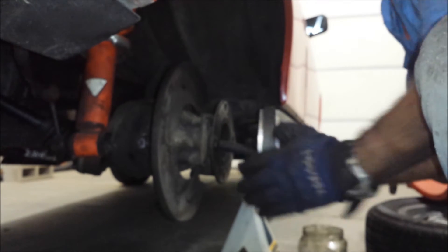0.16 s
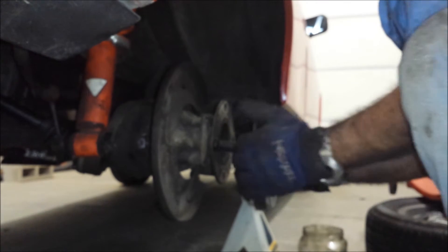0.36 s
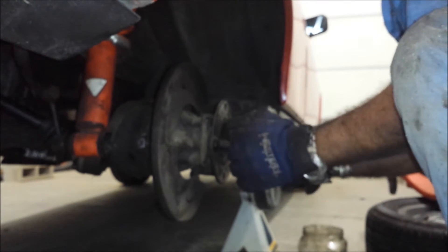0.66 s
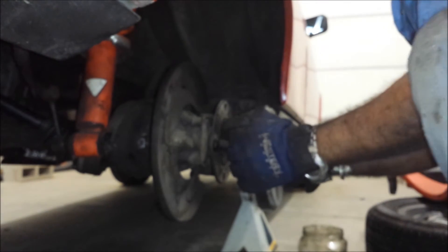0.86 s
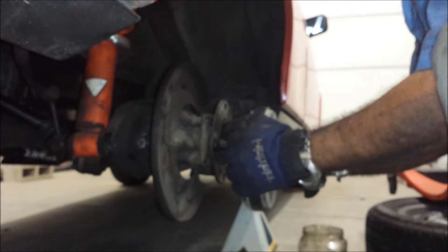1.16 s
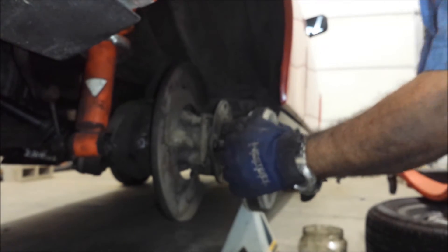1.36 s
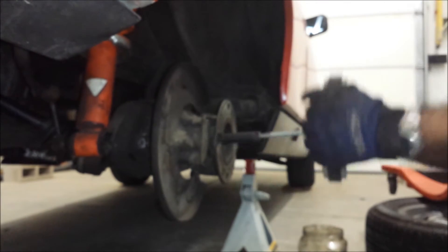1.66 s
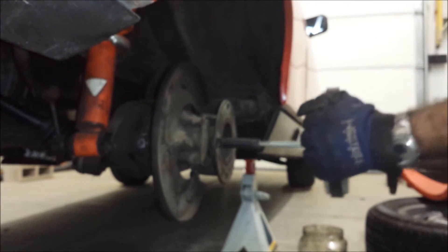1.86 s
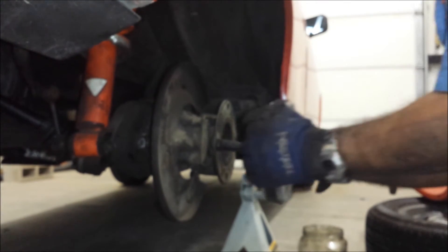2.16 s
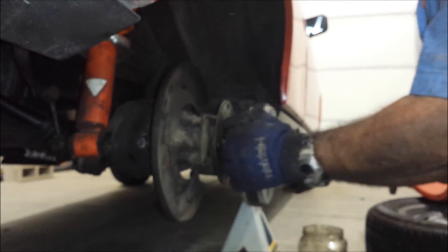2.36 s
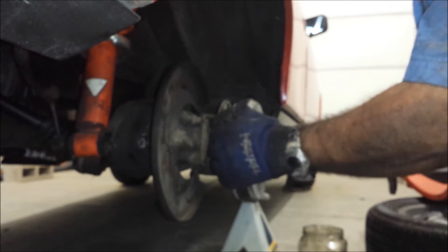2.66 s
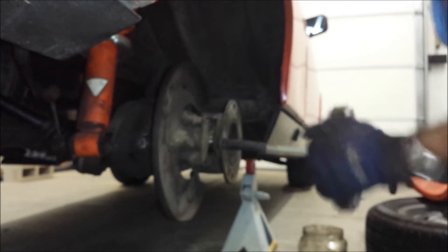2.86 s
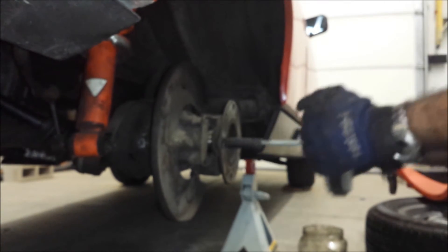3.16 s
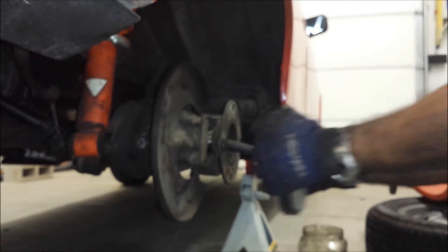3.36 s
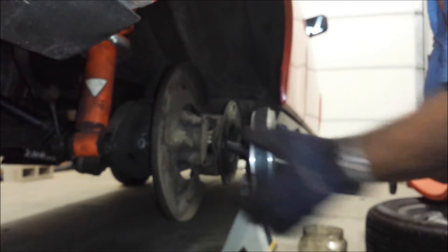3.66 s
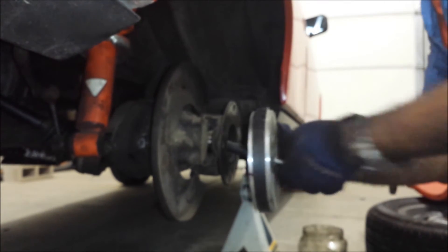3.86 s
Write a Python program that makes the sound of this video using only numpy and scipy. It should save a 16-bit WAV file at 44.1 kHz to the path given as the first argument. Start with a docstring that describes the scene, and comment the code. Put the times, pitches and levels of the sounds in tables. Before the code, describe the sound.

Close beside a car's wheel hub, fading metallic ring and soft cloth rub give way to a sudden huge clanging slam with a dense garage tail. The weight slides back with a gritty singing scrape, then a sharper second slam rings out. After another short slide come a dull knock and faint clinks. The loud hits clip and briefly push the background down.

```python
"""A homemade slide hammer pulls a wheel hub in a garage, over a low hum and hiss. At the start the hub and rod
still ring from an earlier, lighter blow; cloth rubs, small clinks and a soft knock follow. The heavy weight
scrapes along its steel rod and slams into the stop, slides back, and slams again; then it slides and knocks.
Blows are noise bursts with decaying modes and room echoes; friction is filtered noise under movement envelopes.
The microphone overloads: gain control ducks the sound and peaks clip."""
import sys
import numpy as np
from scipy import signal
from scipy.fft import rfft, irfft
from scipy.io import wavfile

SR = 44100
rng = np.random.default_rng(int(sys.argv[2]) if len(sys.argv) > 2 else 0)


def unload_audio(sound):
    """Save the sound as a 16-bit wav file, at the path given as the first command line argument."""
    columns = np.transpose(np.atleast_2d(sound))
    # keep every value between -1 and 1, then stretch to whole-number steps
    steps = np.round(np.clip(columns, -1, 1) * 32767)
    wavfile.write(sys.argv[1], SR, steps.astype(np.int16))


N = 177634
TIME, HZ = np.arange(N) / SR, np.fft.rfftfreq(N, 1 / SR)

# Hub and housing modes. Each row: frequency in Hz, relative level in dB, t60 in seconds.
HOUSING_MODES = [(75, -4, .9), (151, -4, .7), (172, -1, .9), (196, -19, 3.3), (240, 0, .8), (273, -4, .7),
                 (305, -5, .8), (398, -4, .6), (431, 1, .7), (549, -5, .7), (613, -5, .7), (743, -10, .5),
                 (809, 1, .75), (1065, -2, .8), (1092, -4, .6), (1240, -3, .65), (1400, -9, .7),
                 (1470, -9, .7), (1990, -7, .7), (3698, -14, 1.0)]
# Rod and weight modes. Each row: frequency in Hz, relative level in dB, t60 in seconds.
STEEL_MODES = [(1545, -19, .5), (1884, -14, .7), (2789, -16, .6), (3160, -13, .8), (3712, -18, .6),
               (3833, -16, .6), (4269, -19, .6), (4630, -19, .65), (4920, -16, .6), (5238, -14, .85),
               (5454, -13, .5), (5603, -8, .5), (5647, 0, .65), (5662, -5, .5), (5690, -8, .45),
               (5831, -10, .45), (5949, -10, .5), (6122, -12, .45), (6190, -10, .6), (6395, -11, .4),
               (7655, -13, .7), (8016, -19, .6), (9846, -15, .2), (10180, -24, .4), (10228, -21, .5)]
# Likeness of the two ears. Each row: frequency in Hz, correlation from -1 to 1.
EAR_LIKENESS = [(100, .96), (250, 0.75), (500, 0.6), (1000, -0.03), (4000, 0), (14000, 0)]
# Stereo balance of direct sound. Each row: frequency in Hz, left minus right in dB.
NEAR_BALANCE = [(60, -7), (130, 8.5), (290, -1.5), (630, 3.5), (1370, -3.5), (2980, 8), (6520, -0.5),
                (14200, -5)]
# Stereo balance of rings and echoes. Each row: frequency in Hz, left minus right in dB.
ROOM_BALANCE = [(100, 0.5), (300, 0.5), (630, 4), (1400, 3.5), (3000, 4.5), (5700, 9.5), (7000, 6.5),
                (8500, -2), (10200, -20), (14000, 3)]


def amp(db):
    """Decibels to gain."""
    return 10 ** (np.asarray(db) / 20)


def evened(x):
    """Scales to rms 1."""
    return x / np.sqrt(np.mean(x ** 2) + 1e-20)


def read(points, hz=HZ):
    """A table joined by straight lines on a log-frequency axis."""
    f, value = np.transpose(points)
    return np.interp(np.log(hz + 1), np.log(f + 1), value)


def sides(balance, hz=HZ):
    """Left and right gains from a balance table."""
    lean_db = read(balance, hz) / 2
    return amp(np.array([lean_db, -lean_db]))


def noise(gain):
    """Stereo noise of rms 1 with the given spectrum, nearly mono in the bass."""
    shared, apart = rng.standard_normal((2, len(HZ))) + 1j * rng.standard_normal((2, len(HZ)))
    likeness = np.clip(read(EAR_LIKENESS), -1, 1)
    mid = shared * np.sqrt(1 + likeness)
    side = apart * np.sqrt(1 - likeness)
    return evened(irfft(np.array([mid + side, mid - side]) * gain, N))


def wander(rate_hz, size=4096):
    """Slow random drift of rms 1."""
    hz = np.fft.rfftfreq(size, N / SR / size)
    spectrum = rfft(rng.standard_normal(size)) * np.exp(-(hz / rate_hz) ** 2)
    return np.interp(TIME, np.linspace(0, N / SR, size), evened(irfft(spectrum)))


def strike(start_s, rise_s, decay_s):
    """Envelope that swells from its start and dies away."""
    age = np.maximum(TIME - start_s, 0)
    swell = np.minimum(age / rise_s, 1) ** 2
    return swell * np.exp(-np.maximum(age - rise_s, 0) / decay_s)


def stroke(start_s, length_s, db, swell_db, release_s):
    """Envelope of a movement: gets going, swells or fades steadily in dB, dies away."""
    start_share = 0.19  # of the length
    done = np.clip((TIME - start_s) / length_s, 0, 1)
    after = np.maximum(TIME - start_s - length_s, 0)
    return np.minimum(done / start_share, 1) * amp(db + swell_db * done) * np.exp(-after / release_s)


def pulse(center_s, spectrum, length_s):
    """A single shock with the given spectrum, as strong as a full-level burst of that length."""
    shock = irfft(evened(amp(read(spectrum))) * np.exp(-2j * np.pi * HZ * center_s), N)
    return np.sqrt(length_s * SR) * shock * (abs(TIME - center_s) < .01)


def ring(modes, start_s, split_hz=6, twin_gain=0.55, build_cycles=1.8):
    """Modes that build up over a few cycles and die away; uneven parts split each into a beating pair."""
    out = np.zeros((2, N))
    for hz, db, t60_s in modes:
        age = TIME[TIME < t60_s]
        phase, apart, beat, spread = rng.uniform(-0.96, 1, 4)
        # the less alike the ears, the larger the right channel's phase shift may be
        right_lag = apart * (1 - read(EAR_LIKENESS, hz)) / 2
        ear_lag = np.exp(1j * np.pi * np.array([[0], [right_lag]]))
        pair = 1 + twin_gain * np.exp(1j * np.pi * (2 * split_hz * (1 + spread / 2) * age + beat))
        build = 1 - np.exp(-age * hz / build_cycles)
        envelope = build * np.exp(-np.log(1000) * age / t60_s)
        tone = envelope * pair * np.exp(1j * np.pi * (2 * hz * age + phase))
        out[:, :len(age)] += amp(db) * sides(ROOM_BALANCE, hz)[:, None] * (ear_lag * tone).real
    out /= np.sqrt(np.sum(amp(np.transpose(modes)[1]) ** 2))
    # shift to the start, which may lie before time 0
    first = N - round(start_s * SR)
    return np.pad(out, ((0, 0), (N, N)))[:, first:first + N]


def garage(x, build_s=0.043):
    """Dense echoes that build up between the walls, each band dying at its own speed."""
    # Garage decay. Each row: frequency in Hz, t60 in seconds.
    room_t60 = [(60, 1), (250, 0.65), (1000, 0.74), (3000, 0.77), (6000, 0.62), (9000, 0.49), (13000, 0.28)]
    size = 2 * SR
    hz, t, bands = signal.stft(noise(1)[:, :size], SR, nperseg=512)
    bands = bands * amp(-60 * t / read(room_t60, hz)[:, None])
    tail = signal.istft(bands, SR, nperseg=512)[1][:, :size]
    tail = tail * (1 - np.exp(-TIME[:size] / build_s))
    tail = tail / np.sqrt(np.sum(tail ** 2) / 2)
    balanced = irfft(rfft(x) * sides(ROOM_BALANCE), N)
    return signal.fftconvolve(balanced, tail, axes=1)[:, :N]


def blows(thud_delay_s=0.0044, thud_decay_s=0.029, housing_db=-5, echo_db=0.5, spill_db=-11):
    """The weight chatters against the stop; the jolt runs down the rod, thuds in the housing, shakes the car."""
    # Blows on the stop. Each row: start in seconds, level in dB, rise in seconds, chatter decay in seconds,
    # thud in dB, steel ring in dB, car body boom in dB (the last three re the blow).
    blow_rows = [(-.3, -6, 0.0022, .02, -4.5, -15.5, -10), (1.696, 8.5, .0034, 0.026, -6, -12, -16.5),
                 (2.9829, 5.5, .00062, 0.025, -13, -5, -12.5)]
    # Spectra of crack, thud, car body boom and garage echo. Each row: frequency in Hz, relative dB per Hz.
    crack_spectrum = [(30, -27.5), (150, -20), (700, -8), (1080, -11.5), (1450, -11), (2000, -1),
                      (3200, 4.5), (4200, -3.5), (5700, 3.5), (7200, 3), (9000, -8), (11000, -14.5),
                      (14500, -31.5), (16000, -45)]
    thud_spectrum = [(30, -39.5), (150, -21), (270, -24), (420, 9.5), (660, -10.5), (820, -5.5),
                     (1150, 5.5), (1500, -27), (4000, -33)]
    boom_spectrum = [(25, -37.5), (42, -19), (65, 4), (110, -6), (165, 4.5), (290, -2), (400, -40),
                     (900, -38.5), (3000, -72.5)]
    echo_spectrum = [(30, -26), (160, -6.5), (290, 2), (430, 4.5), (700, 1), (900, -3), (1100, 0.5),
                     (1350, 1), (1950, 2.5), (3100, 0.5), (4300, -1), (5800, 8), (8000, 3), (9500, -10),
                     (12000, -41.5)]
    near, sent = np.zeros((2, 2, N))
    for start_s, db, rise_s, decay_s, thud_db, steel_db, boom_db in blow_rows:
        hit_s = start_s + rise_s
        crack = noise(amp(read(crack_spectrum)) * sides(NEAR_BALANCE)) * strike(start_s, rise_s, decay_s)
        thud_envelope = strike(start_s, rise_s + thud_delay_s, thud_decay_s)
        thud = amp(thud_db) * noise(amp(read(thud_spectrum))) * thud_envelope
        housing = amp(thud_db + housing_db) * ring(HOUSING_MODES, hit_s)
        steel = amp(steel_db) * ring(STEEL_MODES, hit_s)
        near += amp(db) * (crack + thud + housing + steel)
        # the garage answers the shock, the boom and some of the thud
        shock = amp(echo_db) * pulse(hit_s, echo_spectrum, length_s=0.0052)
        boom = amp(boom_db) * pulse(hit_s, boom_spectrum, length_s=0.0086)
        sent += amp(db) * (shock + boom + amp(spill_db) * thud)
    return near + garage(sent)


def glove(crinkle_db=1.5, release_s=0.023):
    """Glove and sleeve rub softly as the hand shifts: filtered noise with an uneven level."""
    # Hand moves. Each row: start in seconds, length in seconds, level in dB, swell over the move in dB.
    hand_moves = [(-.05, 0.7, -48, -5), (.93, 0.57, -60.5, -2.5), (1.46, 0.27, -55.5, 7),
                  (2.017, 0.57, -33, -19.5), (2.447, 0.48, -59, 1.5), (3.487, 0.25, -38.5, 2)]
    # Cloth spectrum. Each row: frequency in Hz, relative dB per Hz.
    cloth_spectrum = [(60, 6.5), (300, 7.5), (800, 2.5), (1350, 5.5), (1900, 2), (4000, -5), (6500, 1.5),
                      (9000, -8), (14000, -60)]
    moving = sum(stroke(*row, release_s) for row in hand_moves)
    return noise(amp(read(cloth_spectrum))) * moving * amp(crinkle_db * wander(60))


def background(level_db=-52, waver_db=3.0):
    """Steady rumble and hiss of the room with a hum whose lines waver in level and phase."""
    # Air spectrum. Each row: frequency in Hz, relative dB per Hz.
    air_spectrum = [(15, -38), (30, -13.5), (60, -7.5), (110, -2), (185, -7.5), (230, -22.5), (450, -21.5),
                    (750, -22), (1200, -28.5), (2200, -31), (6000, -32), (10000, -34), (14500, -39.5)]
    # Hum lines. Each row: frequency in Hz, amplitude in dB re the rms of the air.
    hum_lines = [(97.5, -9.5), (117.9, 1), (143.4, -18.5), (194.5, -6), (281, -14.5), (362, -20)]
    hum = 0
    for hz, db in hum_lines:
        level = amp(db + waver_db * wander(3.1))
        hum = hum + level * np.sin(2 * np.pi * hz * TIME + wander(1.6) / 2)
    return amp(level_db) * (noise(amp(read(air_spectrum))) + hum)


def taps(spread_s=0.0044, clink_rise_s=.0005, clink_ring_db=-16, knock_ring_db=-6.5):
    """Bright clinks of steel ring the rod; dull knocks of the weight ring the hub; the room answers both."""
    # Steel-on-steel contacts. Each row: start in seconds, level in dB, decay in seconds, tail in dB re the tap.
    clink_rows = [(0.0, -32, 0.031, 0), (0.374, -52, .006, -4), (1.642, -43, .004, -10),
                  (1.6464, -27, 0.011, -18), (2.9645, -3, .0014, -24), (2.969, -10.5, 0.012, -18),
                  (3.672, -29, 0.0079, 1.5), (3.963, -32.5, 0.0044, -10.5), (3.983, -38.5, 0.0029, -6),
                  (3.991, -30.5, 0.0014, 2)]
    # Knocks at the hub end. Each row: start in seconds, level in dB, rise in seconds, decay in seconds,
    # tail in dB re the tap.
    knock_rows = [(1.097, -42.5, .017, 0.049, -6.5), (3.671, -12.5, 0.001336, 0.011, -9.5)]
    # Spectra of clinks and knocks. Each row: frequency in Hz, relative dB per Hz.
    clink_spectrum = [(40, -22), (400, -4.5), (900, -13.5), (1500, 4), (2600, 2.5), (4200, -27.5),
                      (5800, 10.5), (8000, -17.5), (10000, -39.5), (14000, -34.5)]
    knock_spectrum = [(40, -35.5), (130, -17), (200, 1.5), (300, -3.5), (420, 4), (620, -1), (830, -0.5),
                      (1000, 1), (1450, -10), (2200, -6), (3200, -15.5), (4200, -24), (6500, -14.5),
                      (12000, -44)]
    clinks = [(clink_spectrum, STEEL_MODES, clink_ring_db, start_s, db, clink_rise_s, decay_s, tail_db)
              for start_s, db, decay_s, tail_db in clink_rows]
    knocks = [(knock_spectrum, HOUSING_MODES, knock_ring_db, *row) for row in knock_rows]
    near, sent = np.zeros((2, 2, N))
    for spectrum, modes, ring_db, start_s, db, rise_s, decay_s, tail_db in clinks + knocks:
        hit_s = start_s + rise_s
        tap = noise(amp(read(spectrum))) * strike(start_s, rise_s, decay_s)
        near += amp(db) * (tap + amp(tail_db + ring_db) * ring(modes, hit_s))
        shock = pulse(hit_s + spread_s / 2, spectrum, length_s=decay_s / 2 + rise_s)
        sent += amp(db + tail_db) * shock
    return near + garage(sent, build_s=spread_s)


def rubs(decay_share=.8):
    """The rod's end catches in the hub: short gritty chirps of noise in two resonances of the rod."""
    # Rubs. Each row: start in seconds, level in dB, swell time in seconds, upper resonance gain in dB.
    rub_rows = [(.3, -55.5, 0.11, -3), (1.505, -48, 0.013, -29), (1.636, -40.5, 0.012, -8),
                (2.9628, 3.5, .002, 25), (3.539, -36.5, 0.028, -19), (3.964, -38, 0.021, 15.5)]
    # Lower and upper resonance. Each row: frequency in Hz, width in Hz, relative level in dB.
    rub_modes = [(1360, 130, -9.5), (3300, 140, -11.5)]
    lower, upper = (amp(db) / (1 + (2 * (HZ - hz) / width_hz) ** 2) for hz, width_hz, db in rub_modes)
    out = np.zeros((2, N))
    for start_s, db, swell_s, upper_db in rub_rows:
        grit = noise(lower + amp(upper_db) * upper)
        out += amp(db) * grit * strike(start_s, swell_s, decay_share * swell_s)
    return out


def slide(uneven_db=1.0, lurch_db=2.9, room_db=-13):
    """Uneven friction under the lurching weight sings in the resonances of the rod."""
    # Slides along the rod. Each row: start in seconds, length in seconds, level in dB,
    # swell over the stroke in dB, release in seconds.
    slide_rows = [(1.641, 0.025, -30, 0, 0.0044), (2.137, 0.37, -32, -11, 0.03), (2.887, .06, -29, 9, .01),
                  (2.947, .026, -15, 2, .007), (3.374, 0.22, -31, -8, 0.023), (3.667, 0.013, -36, 1, .012),
                  (3.954, 0.042, -38.5, 6.5, 0.022)]
    # Rod resonances. Each row: frequency in Hz, width in Hz, relative level in dB.
    rod_modes = [(1360, 130, -11), (3180, 110, -11), (4720, 110, -3), (5650, 70, -11), (6540, 110, 0),
                 (7630, 80, 0), (8600, 90, -3), (9870, 60, -6), (10950, 140, -11), (13500, 200, -13),
                 (14000, 200, -14)]
    # Friction spectrum. Each row: frequency in Hz, relative dB per Hz.
    grit_spectrum = [(100, -14.5), (1000, -22), (3500, -23.5), (7500, -10.5), (10000, -53.5), (14500, -54)]
    power = amp(read(grit_spectrum)) ** 2
    for hz, width_hz, db in rod_modes:
        power = power + amp(db) ** 2 / (1 + (2 * (HZ - hz) / width_hz) ** 2)
    moving = sum(stroke(*row) for row in slide_rows)
    grip = moving * amp(uneven_db * wander(73) + lurch_db * wander(16))
    scrape = noise(np.sqrt(power) * sides(NEAR_BALANCE)) * grip
    return scrape + amp(room_db) * garage(scrape)


def duck(x, threshold_db, squeeze, deepest_db, attack_s, recover_db_per_s):
    """Gain control: cuts a share of the excess level, a little late, and recovers at a steady rate."""
    pole, lag = np.exp(-1 / (np.array([.0022, attack_s]) * SR))  # level is smoothed over 2.2 ms
    power = signal.lfilter([1 - pole], [1, -pole], (x ** 2).mean(0))
    power_db = 10 * np.log10(power + 1e-12)
    cut_db = np.clip(squeeze * (power_db - threshold_db), 0, deepest_db)
    fall_db = TIME * recover_db_per_s
    held_db = np.maximum.accumulate(cut_db + fall_db) - fall_db
    return x * amp(-signal.lfilter([1 - lag], [1, -lag], held_db))


def scene():
    """Everything heard beside the wheel arch."""
    return blows() + glove() + background() + taps() + rubs() + slide()


def record(dry, ceiling=0.92, edge_hz=14850):
    """Slow gain control holds the room down after a slam, a quick one flattens the tail; clip; band limit."""
    held = duck(dry, threshold_db=-7.5, squeeze=1.0, deepest_db=14, attack_s=0.0055, recover_db_per_s=3.5)
    ducked = duck(held, threshold_db=-6, squeeze=0.29, deepest_db=9, attack_s=0.014, recover_db_per_s=40.5)
    clipped = np.clip(ducked, -ceiling, ceiling)
    lowpass = signal.firwin(511, edge_hz, window=("kaiser", 8), fs=SR)
    return signal.oaconvolve(clipped, lowpass[None], "same")


dry = scene()
out = record(dry)
unload_audio(out)
```